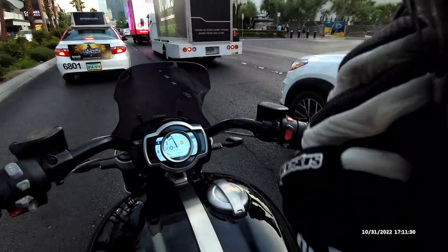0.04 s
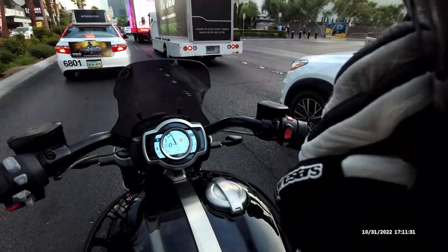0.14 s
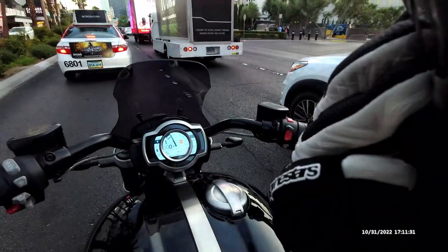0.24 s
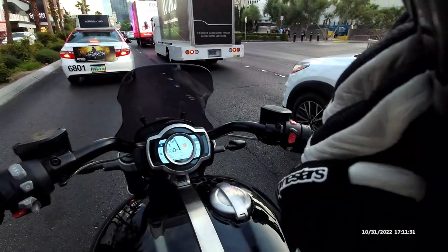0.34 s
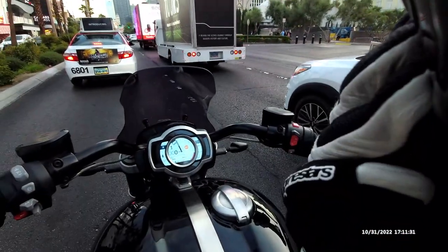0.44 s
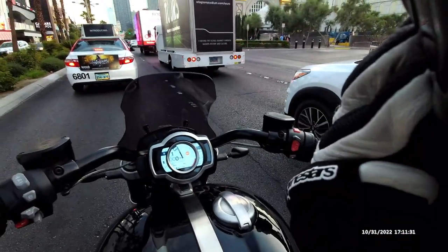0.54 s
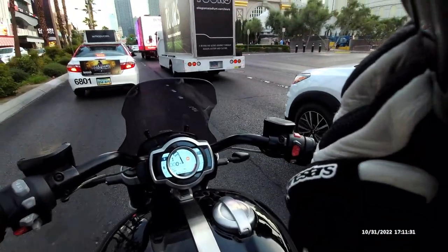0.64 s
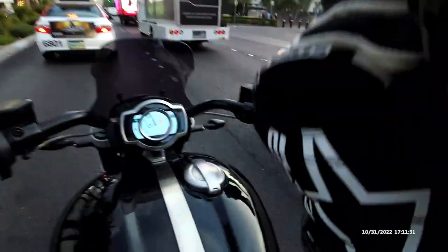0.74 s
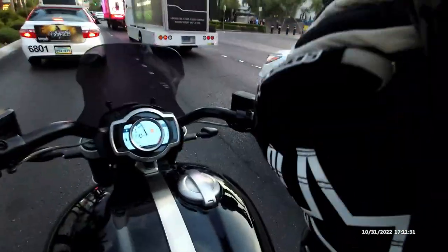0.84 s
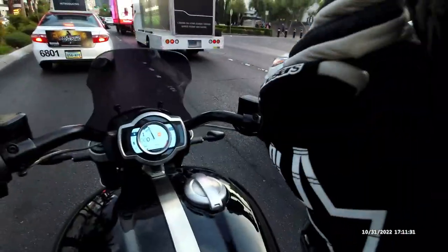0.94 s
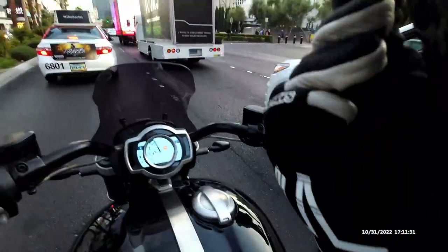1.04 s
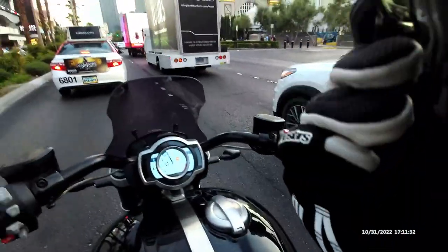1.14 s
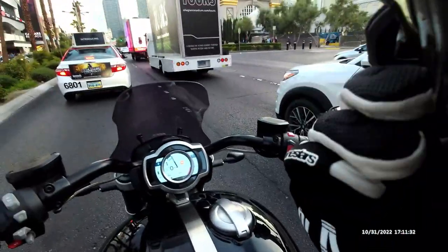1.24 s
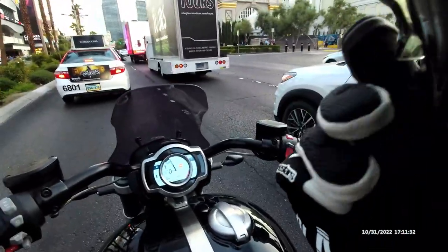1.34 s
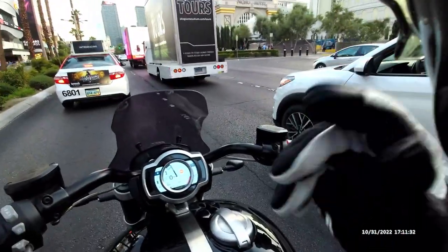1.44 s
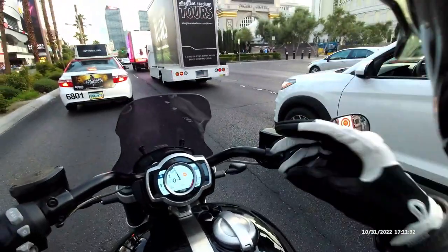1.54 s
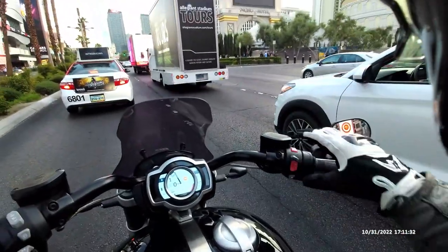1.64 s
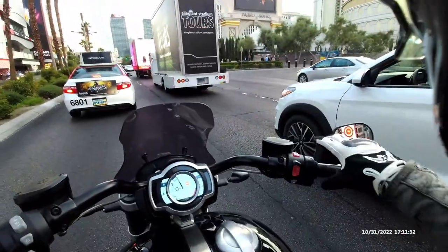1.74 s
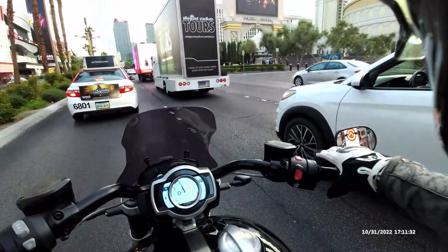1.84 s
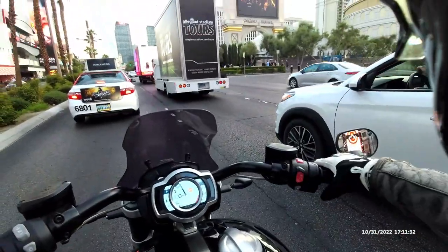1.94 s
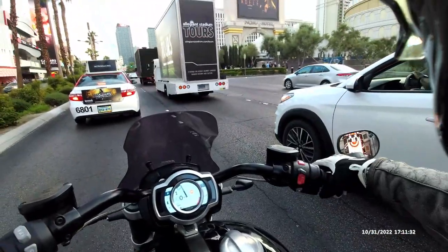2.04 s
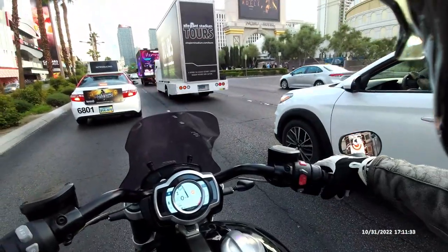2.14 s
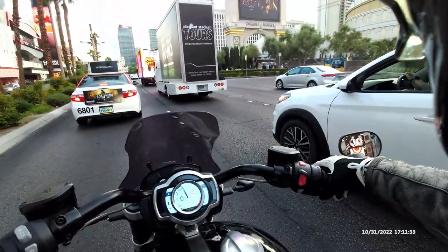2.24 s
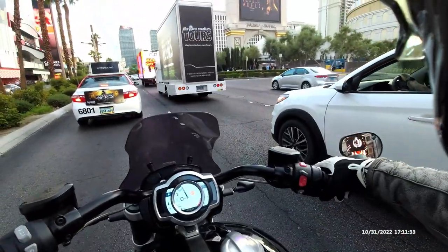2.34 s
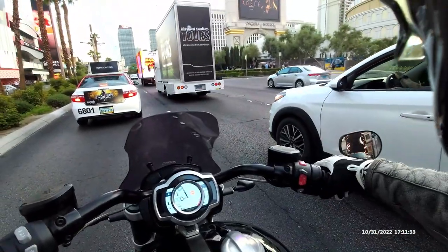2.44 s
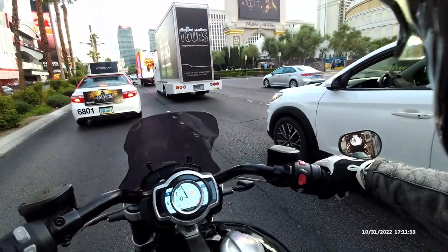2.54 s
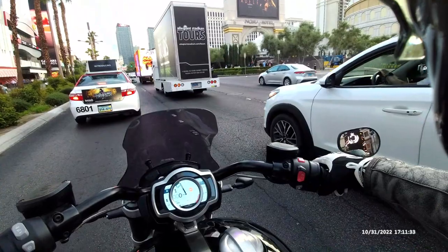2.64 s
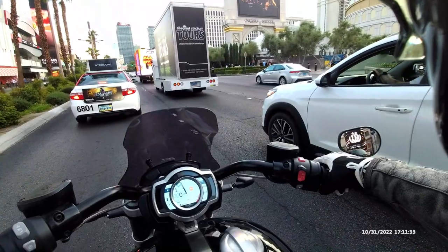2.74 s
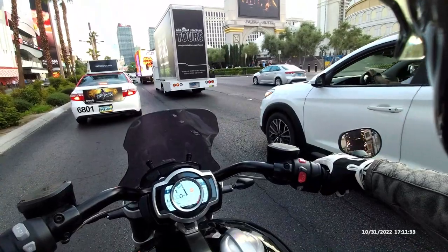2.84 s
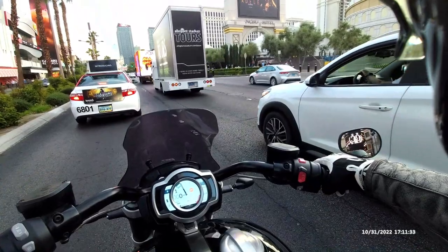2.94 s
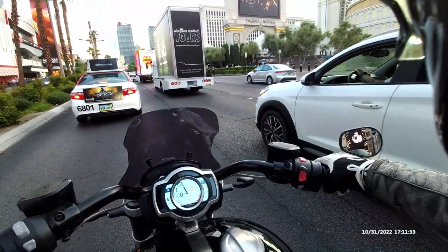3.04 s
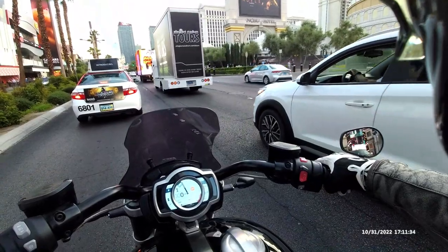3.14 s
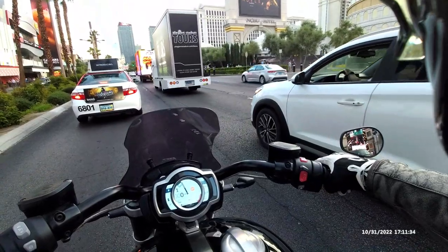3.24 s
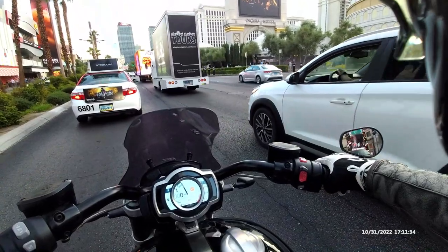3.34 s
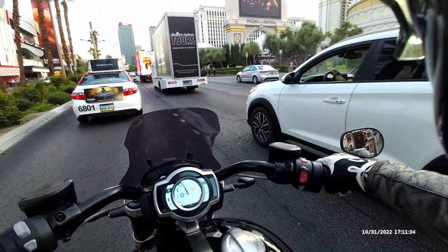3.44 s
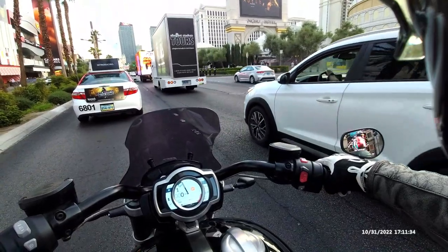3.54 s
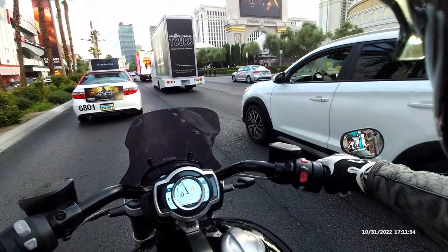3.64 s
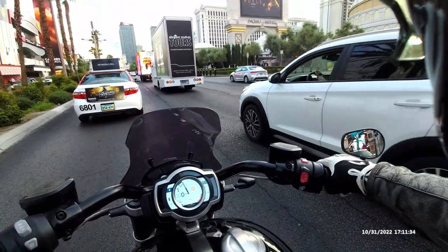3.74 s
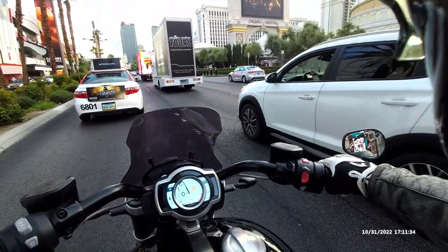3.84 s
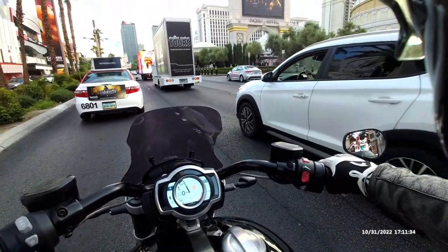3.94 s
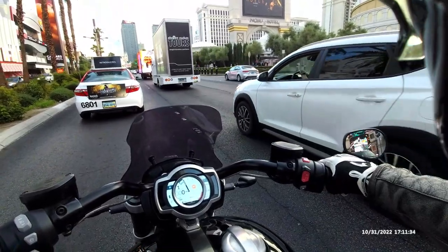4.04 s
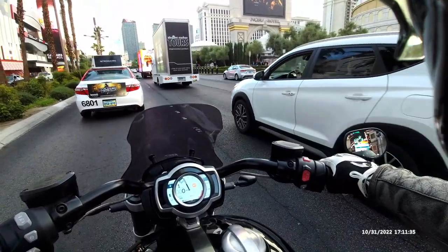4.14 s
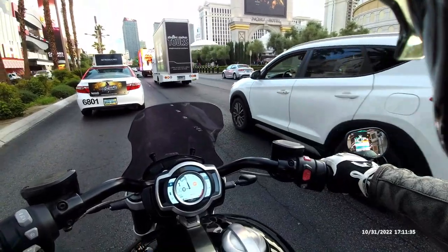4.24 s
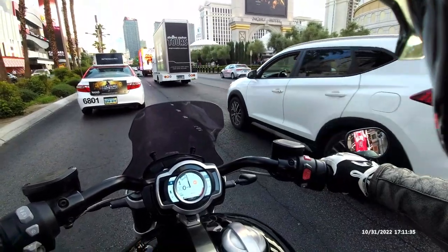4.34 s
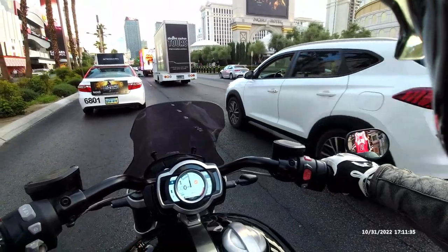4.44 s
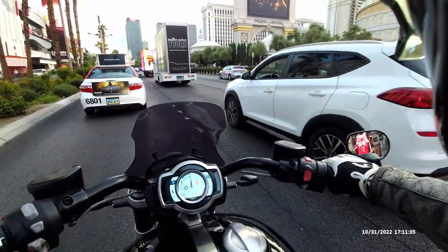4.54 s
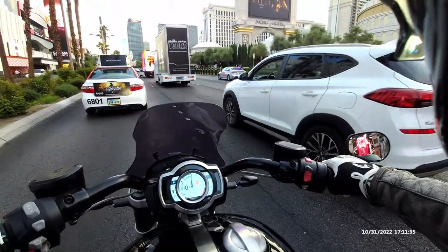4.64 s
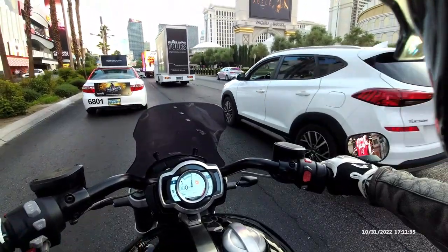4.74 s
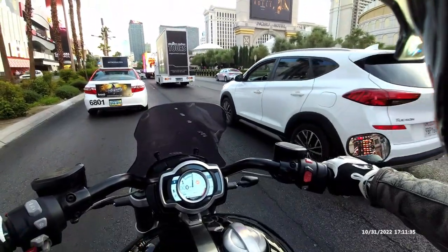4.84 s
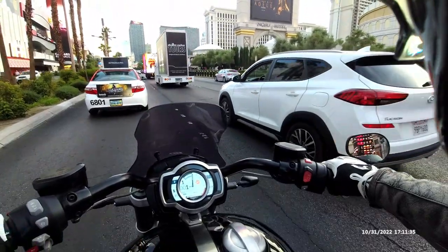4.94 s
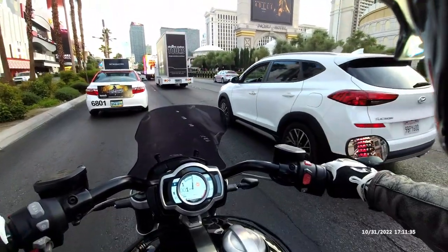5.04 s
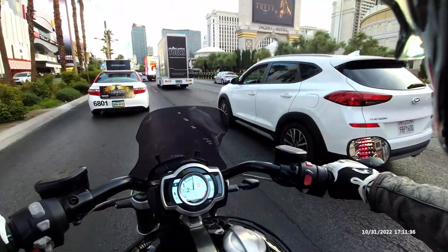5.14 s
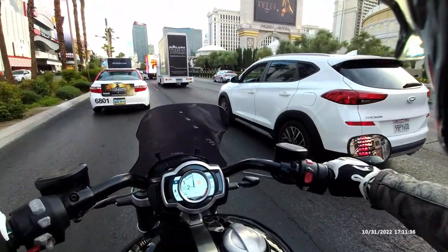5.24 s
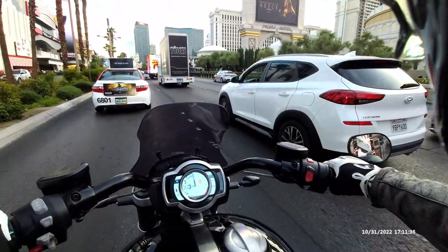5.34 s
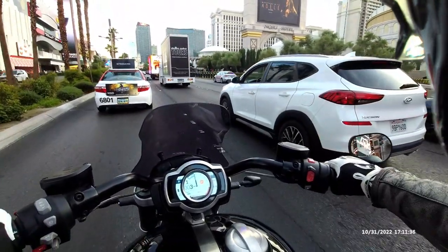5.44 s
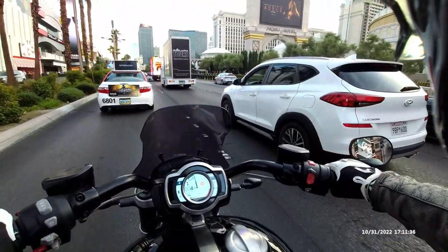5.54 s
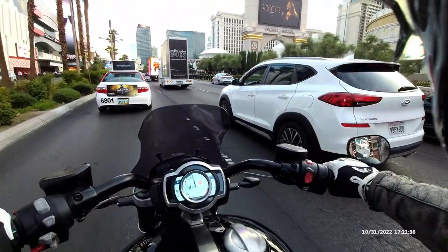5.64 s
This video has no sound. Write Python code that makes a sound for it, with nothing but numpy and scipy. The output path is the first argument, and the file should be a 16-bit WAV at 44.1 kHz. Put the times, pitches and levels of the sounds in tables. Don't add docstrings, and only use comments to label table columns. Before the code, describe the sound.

Heard from a rider's helmet on a busy street, a three-cylinder motorcycle idles in low, separate, uneven pops. Gloves click and rub on the shell, and the visor latches and thumps shut with a crunch and tiny creak. A car hums softly past and faint brakes squeak. Then a throttle blip turns the pops into a smooth rising boom with airy rasp, dropping to a burble.

```python
import sys
import numpy as np
from scipy import signal
from scipy.fft import rfft, irfft, next_fast_len
from scipy.io import wavfile
from scipy.ndimage import uniform_filter1d

SR = 44100
rng = np.random.default_rng(int(sys.argv[2]) if len(sys.argv) > 2 else 0)


def ratio_of_db(decibels):
    return 10 ** (np.asarray(decibels, float) / 20)


def waveform_to_disk(signal):
    frames = np.transpose(np.atleast_2d(signal))
    scaled = np.clip(frames, -1, 1) * 32767
    samples = np.round(scaled).astype(np.int16)
    wavfile.write(sys.argv[1], SR, samples)


N = 251370


def evened(x):
    return x / np.sqrt(np.mean(x ** 2) + 1e-20)


def read(points, hz):
    f, value = np.transpose(points)
    return np.interp(np.log(hz + 1), np.log(f + 1), value)


def curves(rows):
    s, *columns = np.transpose(rows)
    t = np.arange(N) / SR
    left = s[-1] - t if s[-1] < t[-1] else np.inf
    ramp = np.clip(np.minimum(t - s[0], left) / .02, 0, 1)
    return [np.interp(t, s, c) for c in columns] + [np.sin(ramp * np.pi / 2) ** 2]


def add(mix, s, sound):
    part = mix[round(s * SR):][:len(sound)]
    part += sound[:len(part)]


def ring(hz, t60, rise=0.00011, size=6000):
    t = np.arange(size) / SR
    return np.sin(2 * np.pi * hz * t) * ratio_of_db(-60 * t / t60) * (1 - np.exp(-t / rise))


def resonate(x, hz, width):
    turn = np.exp(2j * np.pi * np.cumsum(hz * np.ones(len(x))) / SR)
    r = np.exp(-np.pi * width / SR)
    return 2 * (turn * signal.lfilter([1 - r], [1, -r], x / turn)).real


def noise(colour, lo_hz, hi_hz):
    frames, hz = N // 256 + 5, np.fft.rfftfreq(1024, 1 / SR)
    a, b, patches = rng.standard_normal((frames, 513, 3)).T
    patches = uniform_filter1d(uniform_filter1d(patches, size=12, axis=0), size=10, axis=1)
    patchy = ratio_of_db(1.25 * evened(patches))
    gain = ratio_of_db(read(colour, hz))
    x = signal.istft((a + 1j * b) * gain[:, None] * patchy, nperseg=1024, noverlap=768)[1][:N]
    in_band = (hz > lo_hz) & (hz < hi_hz)
    return evened(x) * np.linalg.norm(gain) / np.linalg.norm(gain[in_band])


# time in seconds, effort above idle in dB.
EFFORT = [(0, -1.5), (4.08, 0), (4.24, 4.5), (4.42, 7), (4.68, 8.5), (4.9, 7.5), (5.15, 6), (5.4, 3.5),
          (5.7, 3.5)]


def effort_db():
    return curves(EFFORT)[0]


def layer_db(idle_db, shut_db, share):
    return idle_db + shut_db * (np.arange(N) > .74 * SR) + share * effort_db()


# pitch in Hz, width in Hz, level in dB.
PIPE_NOTES = [(99.8, 26, -3), (162, 27, -8), (189.5, 42.2, 8.5), (273.6, 32, -7), (315, 260, -38),
              (450, 170, -11)]
CYLINDER_DB = [0, -4, 0]
# time in seconds, change in dB.
STUMBLES = [
    (.545, -9.5),
    (.905, -27.5),
    (1.555, -3),
    (2.11, -6),
    (2.35, -15),
    (2.51, -2),
    (2.75, -5.5),
    (2.985, -11.5),
    (3.47, -3.5),
    (3.63, -10.5),
]


def pops(at, chance, opened):
    gap = np.gradient(at)
    at = np.clip(at + (.012 * gap * chance[:, -1]).astype(int), 0, N - 1)
    size_db = np.resize(CYLINDER_DB, len(at)) + .8 * chance[:, -2]
    size_db += (layer_db(idle_db=-27.5, shut_db=-5, share=.2) - 12 * opened)[at]
    for s, db in STUMBLES:
        size_db[np.argmin(abs(at - s * SR))] += db
    pipe = np.zeros(N)
    for k, (hz, width, db) in enumerate(PIPE_NOTES):
        train = np.zeros(N)
        train[at] = ratio_of_db(db + size_db + .9 * chance[:, k]) * np.sqrt(gap / SR)
        pipe += signal.oaconvolve(train, ring(hz, 3.54 / width, rise=0.0049))[:N]
    return ratio_of_db(21.0) * pipe


# pitch in Hz, level in dB.
SILENCER = [(55, -35.5), (80, -26), (103, -22), (140, -32.5), (170, -25.5), (208, -23), (250, -37),
            (305, -30.5), (370, -69), (520, -44.5), (700, -54.5)]


def boom(speed, turns, opened):
    out = np.zeros(N)
    lo, hi = 100, 200
    burble = np.clip((np.arange(N) / SR - 5.2) / .3, 0, 1)
    for k in range(1, 14):
        hz = k * speed
        phase = .9 - .3 * k
        phase += 1.2 * np.clip((hz - lo) / (hi - lo), 0, 1) + .005 * np.maximum(hz - hi, 0)
        flutter = evened(uniform_filter1d(rng.standard_normal(N), size=1600))
        level_db = -1 * (k % 2) + .17 * k * flutter
        level_db += 10 * burble * np.exp(-((hz - 265) / 40) ** 2)
        drift = uniform_filter1d(uniform_filter1d(rng.standard_normal(N), size=1500), size=1500)
        phase += .025 * max(k - 3, 0) * burble * evened(drift)
        out += ratio_of_db(read(SILENCER, hz) + level_db) * np.cos(2 * np.pi * (k * turns + phase))
    return opened * ratio_of_db(-4 + 0.72 * effort_db()) * out


# pitch in Hz, level in dB per Hz.
RASP_COLOUR = [(35, -30.5), (60, 14), (91, -9), (140, -6), (199, -1), (286, -12.5), (484, -14.5),
               (660, -23.5), (765, -23), (1500, -68.5), (1950, -69), (3300, -120)]
# pitch in Hz, level in dB per Hz.
WASH_COLOUR = [(600, -42.5), (900, -2), (1400, -11.5), (1700, -11), (2200, -15.5), (2900, -16.5),
               (3500, -22), (3950, -33.5), (4400, -31), (5000, -32.5), (5600, -36), (6500, -33.5),
               (11000, -46.5), (15000, -44)]
# pitch in Hz, level in dB per Hz.
HISS_COLOUR = [(2060, -21), (3500, 2), (4130, -19), (4970, -2), (6570, -10.5), (9260, -5), (11100, -3),
               (12600, -4.5), (15000, -10), (16000, -30)]


def gas(firings, chance, opened):
    gust = ratio_of_db(1.2 * chance[np.minimum(firings.astype(int), len(chance) - 1), 0])
    puff = evened(1.6 + uniform_filter1d(gust * np.exp(-(firings % 1) / .45), size=160))
    rasp_db = layer_db(idle_db=-48, shut_db=3.84, share=1) - 1.06
    rasp = ratio_of_db(rasp_db) * puff * noise(RASP_COLOUR, lo_hz=350, hi_hz=1000)
    bass = signal.sosfiltfilt(signal.butter(2, 280, fs=SR, output="sos"), rasp)
    rasp -= (1 - ratio_of_db(-4 * opened)) * bass
    wash_db = layer_db(idle_db=-64.5, shut_db=4.93, share=0.73)
    wash = ratio_of_db(wash_db) * evened(0.9 + puff) * noise(WASH_COLOUR, lo_hz=1178, hi_hz=3880)
    hiss_db = layer_db(idle_db=-59, shut_db=-2.1, share=1.08) - 15.0
    hiss = ratio_of_db(hiss_db) * evened(0.71 + puff) * noise(HISS_COLOUR, lo_hz=4860, hi_hz=14300)
    return rasp + wash + hiss


# time in seconds, firings a second.
SPEED = [(0.0, 26.96), (0.3, 25.07), (1.0, 25.11), (1.3, 24.34), (1.75, 24.59), (2.0, 26.2), (2.25, 24.71),
         (2.75, 25.4), (3.0, 24.88), (4.03, 24.93), (4.17, 30.2), (4.3, 40.24), (4.6, 52.25), (4.75, 53.46),
         (4.95, 49.31), (5.4, 34.56), (5.6, 31.34), (5.7, 32.63)]


def engine():
    speed = curves(SPEED)[0]
    turns = np.cumsum(speed) / SR - .0376
    firings = turns + .24
    opened = np.clip((speed - 26) / (36 - 26), 0, 1)
    at = np.flatnonzero(np.diff(np.floor(firings), prepend=-1))
    chance = rng.standard_normal((len(at), len(PIPE_NOTES) + 2))
    return pops(at, chance, opened) + boom(speed, turns, opened) + gas(firings, chance, opened)


# start in seconds, ring in dB, treble in dB, low knock in dB.
CLICKS = [(0.0084, -33, -58.5, -26), (0.0191, -45, -37, -51), (0.0626, -40.5, -37, -38),
          (0.2539, -43.5, -45.5, -25), (0.3443, -42, -42, -32.5), (0.3735, -44, -40.5, -28.5),
          (0.3921, -33.5, -55, -46), (0.4382, -47, -43.5, -54), (0.4741, -35, -42.5, -18),
          (0.501, -37, -50.5, -27.5), (0.5262, -37, -28.5, -48), (0.5518, -46, -41.5, -55),
          (0.565, -34.5, -43, -48), (0.5968, -36.5, -45, -52), (0.6163, -43, -43, -54),
          (0.6425, -41, -42, -54), (0.6591, -24, -54, -15.5), (0.6799, -33, -49, -22.5),
          (0.7078, -34, -45, -29), (0.7305, -27, -32, -9.5), (0.775, -41, -47, -45),
          (0.806, -41.5, -44, -50), (0.9058, -37, -68, -33), (0.919, -50, -60, -47),
          (0.9442, -35.5, -46, -51), (0.988, -44, -52, -34), (1.0142, -29, -49, -36),
          (1.0455, -34.5, -59, -26.5), (1.2975, -38, -39, -38), (1.6495, -38.5, -38.5, -40)]


def glove_clicks():
    out = np.zeros(N)
    t = np.arange(900) / SR
    high = signal.butter(3, 4200, "high", fs=SR, output="sos")
    low = signal.butter(3, [290, 1050], "band", fs=SR, output="sos")
    for s, db, treble_db, knock_db in CLICKS:
        hz = 1780 * (1 + .12 * rng.uniform(-1, 1))
        burst = rng.standard_normal((3, len(t)))
        shell = signal.butter(2, [.7 * hz, 1.55 * hz], "band", fs=SR, output="sos")
        add(out, s, ratio_of_db(db - 4.0) * evened(signal.sosfilt(shell, burst[0])) * ratio_of_db(-60 * t / 0.016))
        add(out, s, ratio_of_db(treble_db - 3.0) * signal.sosfilt(high, burst[1]) * ratio_of_db(-60 * t / 0.01))
        add(out, s, ratio_of_db(knock_db - 10.5) * evened(signal.sosfilt(low, burst[2])) * ratio_of_db(-60 * t / 0.039))
    return out


# start in seconds, rise in seconds, hold in seconds, level in dB, fade in dB a second.
RUBS = [
    (0.336, .08, 0.14, -57.5, 300),
    (0.714, 0.015, 0.0062, -33, 897),
    (0.745, 0.021, 0.022, -47.5, 73),
    (0.808, 0.055, .12, -54.5, 59),
    (0.975, 0.066, 0.044, -49, 89),
]
# pitch in Hz, level in dB per Hz.
CRUNCH_COLOUR = [(250, -25), (400, -9), (700, -3.5), (1100, -12.5), (2000, -16), (3000, -29), (5000, -34.5),
                 (9000, -44), (14000, -37)]


def rubbing():
    t = np.arange(N) / SR
    rubs = np.zeros(N)
    for s, rise, hold, db, fade_db in RUBS:
        fade = fade_db * np.maximum(t - s - rise - hold, 0)
        rubs += np.clip((t - s) / rise, 0, 1) ** 2 * ratio_of_db(db - fade)
    grit = ratio_of_db(4 * evened(uniform_filter1d(rng.standard_normal(N), size=90)))
    return rubs * evened(grit) * noise(CRUNCH_COLOUR, lo_hz=500, hi_hz=15000)


VISOR_S = [
    .659,
    .7340,
    .739,
    .7335,
]
# level in dB, pitch in Hz, ringing time (or length of the blow) in seconds.
VISOR = [
    (-14, 430, 0.025),
    (-3, 175, 0.0036),
    (-14, 243, 0.038),
    (-13, 390, 0.05),
]


def visor():
    out = np.zeros(N)
    for k in (0, 2, 3):
        db, hz, t60 = VISOR[k]
        add(out, VISOR_S[k], ratio_of_db(db) * ring(hz, t60, rise=0.00087))
    db, hz, length = VISOR[1]
    t = np.arange(N) / SR - VISOR_S[1]
    swing = np.cos(2 * np.pi * hz * (t - .0013))
    return out - ratio_of_db(db) * swing * np.exp(-(t / length) ** 2)


# time in seconds, level in dB, slips a second.
CREAK = [
    (1.035, -57, 79),
    (1.047, -59.5, 154),
    (1.1, -62.5, 176),
    (1.125, -69, 150),
    (1.14, -66, 78),
]


def creak():
    db, rate, on = curves(CREAK)
    slips = np.diff(np.floor(np.cumsum(rate) / SR), prepend=0) * rng.uniform(.6, 1.3, N)
    shell = ring(2230, t60=0.0062, rise=0.00013) + 0.27 * ring(2800, t60=0.0043, rise=0.00061)
    return ratio_of_db(db + 29.5) * on * signal.oaconvolve(slips, shell)[:N]


def tones(tables, width, over_db):
    out = np.zeros(N)
    for rows in tables:
        span = slice(round(rows[0][0] * SR), round(rows[-1][0] * SR))
        hz, db, on = (c[span] for c in curves(rows))
        tone = resonate(rng.standard_normal(len(hz)), hz, width)
        tone = evened(resonate(tone, hz, width))
        octave = tone ** 2 - uniform_filter1d(tone ** 2, size=1500)
        out[span] += ratio_of_db(db) * on * (tone + ratio_of_db(over_db) * octave)
    return out


def glides(rows):
    return [[(s, hz, db), (s + length, hz + glide_hz, db)] for s, length, hz, glide_hz, db in rows]


# start in seconds, length
# in seconds, pitch in Hz, glide in Hz, level in dB.
DRAGS = [
    (1.85, 1.0, 11050, -100, -82),
    (1.8, 1.1, 12350, -100, -87),
    (3.35, .6, 8600, 0, -87),
    (1.9, 2.0, 4900, 0, -84),
    (4.35, .8, 11100, 0, -82),
]
# start in seconds, length in seconds, pitch in Hz, glide in Hz, level in dB.
SQUEAKS = [
    (3.31, .11, 10700, 500, -73),
    (3.42, .04, 11700, 1400, -78),
    (3.46, .19, 13100, -2150, -80),
    (3.77, .08, 12600, -650, -74),
    (3.87, .06, 12700, -550, -75),
    (3.8, .11, 8630, -200, -80),
    (5.33, .08, 12300, -250, -74),
    (5.44, .12, 12200, 0, -77),
    (5.62, .07, 11800, 1300, -73),
]


def brakes():
    drags = tones(glides(DRAGS), width=420, over_db=-54)
    return drags + tones(glides(SQUEAKS), width=170, over_db=-66)


# time in seconds, firing tone in Hz, level in dB.
CAR = [
    [(2.25, 123.4, -48), (2.5, 124, -40), (3.1, 121, -38), (3.5, 114.4, -44), (4.15, 115, -50)],
]


def car():
    return tones(CAR, width=1.5, over_db=-23)


def scene():
    mid = engine() + visor() + brakes() + car()
    shell = glove_clicks() + rubbing() + creak()
    return mid + np.array([.94 * shell, 1.06 * shell])


def roll_off(x):
    return signal.sosfilt(signal.butter(12, 15800, fs=SR, output="sos"), x)


# pitch in Hz, side against mid in dB.
PORTS = [(60, -1.5), (110, -5.5), (200, -12), (380, -18.5), (700, -22), (1290, -27), (2380, -26),
         (4400, -21.5), (8120, -20), (15000, -25)]


def record(dry):
    size = next_fast_len(N + 4096)
    hz = np.fft.rfftfreq(size, 1 / SR)
    band = 0.0059 + 1 / np.sqrt(1 + (62 / (hz + 1)) ** 12)
    band /= np.sqrt(1 + (hz / 15600) ** 30)
    fade = np.clip((size - np.arange(size)) / (size - N), 0, 1)
    ports = rfft(np.pad(dry, [(0, 0), (0, size - N)], "reflect") * fade) * band
    turned = ports.mean(0) * ratio_of_db(read(PORTS, hz)) * np.exp(1.57j)
    mix = irfft(ports + [turned, -turned], size)[:, :N]
    return roll_off(mix)


dry = scene()
out = record(dry)
waveform_to_disk(out)
```